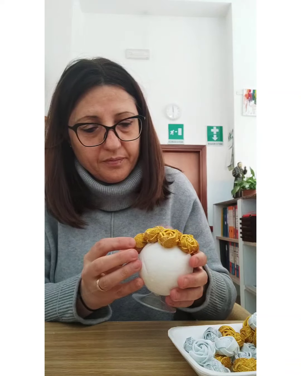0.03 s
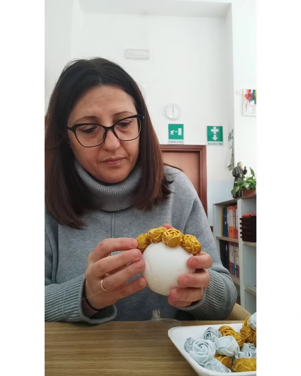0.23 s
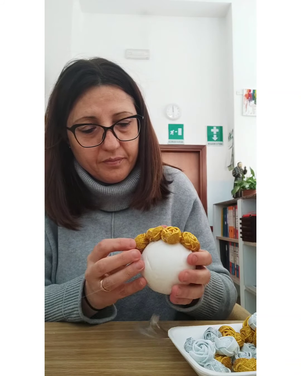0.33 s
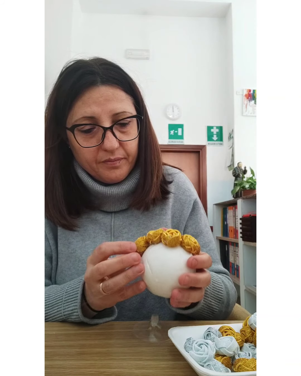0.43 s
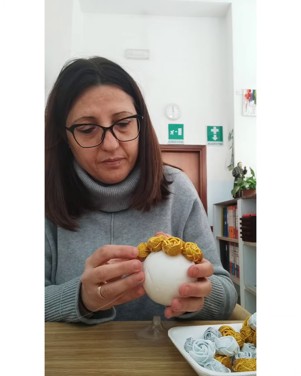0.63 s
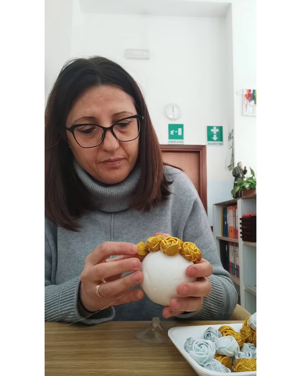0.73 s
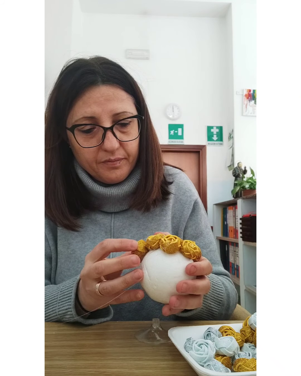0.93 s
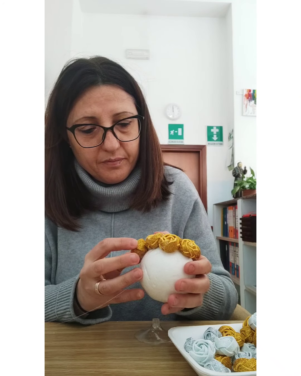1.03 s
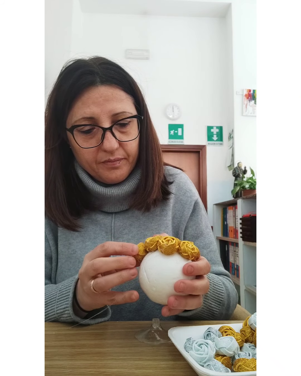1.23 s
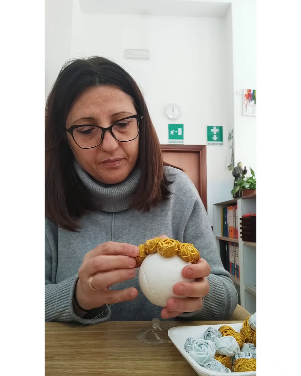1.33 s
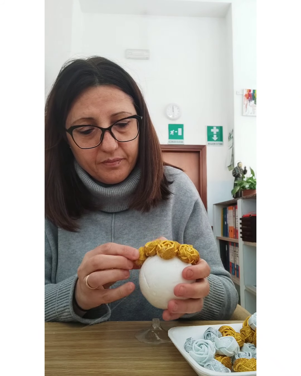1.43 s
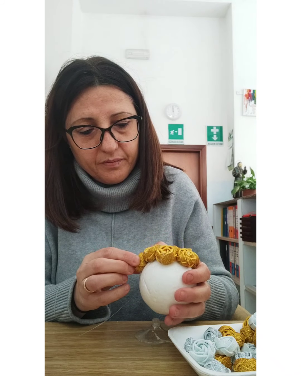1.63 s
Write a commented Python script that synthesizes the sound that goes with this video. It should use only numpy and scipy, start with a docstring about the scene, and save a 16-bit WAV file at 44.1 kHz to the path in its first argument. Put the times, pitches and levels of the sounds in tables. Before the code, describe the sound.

A small stand holding a foam ball lands on a wooden table with three quick knocks, then judders along in a squeaky, rattling scrape; soft hand brushes before and after, close stereo microphones, echoing room.

```python
"""Foam ball on a stand, pushed over a table

A foam ball on a clear stemmed stand is set down on a wooden table and pushed along it in a bare, echoing room.
The foot knocks three times (struck modes, crack, thud), then judders in tiny slips: noise bursts and chirps.
Fingers and sleeves brush the foam and its fabric flowers before and after, as swells of grainy noise.
Behind lies a faint room rumble of filtered noise. The stand is nearer the left of two microphones."""
import sys
import numpy as np
from scipy import signal
from scipy.fft import rfft, irfft
from scipy.io import wavfile
from scipy.ndimage import uniform_filter1d

SR = 44100
rng = np.random.default_rng(int(sys.argv[2]) if len(sys.argv) > 2 else 0)


def dump(signal):
    """Clip the signal to [-1, 1] and save it as 16-bit WAV at the path in sys.argv[1]."""
    limited = np.clip(np.atleast_2d(signal).T, -1, 1)
    pcm = np.round(limited * 32767).astype(np.int16)
    wavfile.write(sys.argv[1], SR, pcm)


N = 74970
TIME = np.arange(N) / SR

# modes of the stand: (frequency [Hz], relative level [dB], t60 [s])
STAND_MODES = [(2390, -7.5, 0.019), (2460, -15.5, 0.012), (2996, -8, 0.073), (3320, -3.5, 0.02),
               (3832, -14, 0.09), (6325, 3, 0.029), (6700, -12, 0.066), (7640, -3.5, 0.011),
               (7990, -9.5, .04), (9280, -27.5, 0.024), (10700, -25, 0.036), (11390, -25.5, 0.035),
               (11800, -35, .03), (13700, -14.5, 0.009), (16100, -19, .014)]
# modes of the table top: (frequency [Hz], relative level [dB], t60 [s])
TABLE_MODES = [(188, -12.5, 0.056), (230.5, -10, 0.044), (465, -8, .025), (872, -10.5, 0.05)]

SCRAPE_LIKENESS = 0.53   # how alike the two microphones hear scrape and crack, 1 = the same
SLIP_SPREAD_DB = 4   # spread of strength from slip to slip


def from_db(db):
    """Decibels to gain."""
    return 10 ** (np.asarray(db) / 20)


def rms_one(x):
    """Scale to rms 1."""
    return x / np.sqrt(np.mean(x ** 2) + 1e-20)


def at_hz(points, hz):
    """Read a table on a log-frequency axis."""
    f, value = np.transpose(points)
    return np.interp(np.log(np.maximum(hz, 1)), np.log(f), value)


def level_curve(rows):
    """Gain that follows (time [s], level [dB]) rows and is silent outside them."""
    return from_db(np.interp(TIME, *np.transpose(rows), left=-np.inf, right=-np.inf))


def fade(start, length):
    """Sudden onset and exponential decay, to 1/e after the length in seconds."""
    return (TIME >= start) * np.exp(-np.maximum(TIME - start, 0) / length)


def swell(centre, half_length):
    """A smooth bell-shaped rise and fall."""
    return np.exp(-.5 * ((TIME - centre) / half_length) ** 2)


def noise(likeness):
    """Stereo white noise whose channels are partly alike."""
    mid, side = rng.standard_normal((2, N))
    c = np.clip(likeness, -1, 1)
    opposite = side * np.array([[1], [-1]])
    return (np.sqrt(1 + c) * mid + np.sqrt(1 - c) * opposite) / np.sqrt(2)


def colour(x, spectrum, share=1, keep_power=True):
    """Causal (minimum-phase) filter that follows a share of a dB spectrum."""
    gain = from_db(share * at_hz(spectrum, np.fft.rfftfreq(2 * N, 1 / SR)))
    cepstrum = irfft(np.log(rms_one(gain) if keep_power else gain))
    # folding the cepstrum onto positive time makes the phase minimal
    cepstrum[1:N] *= 2
    cepstrum[N + 1:] = 0
    return irfft(rfft(x, 2 * N) * np.exp(rfft(cepstrum)))[..., :N]


def ring(x, hz, t60):
    """A two-pole resonance: a unit click sets a decaying sine of height about 1 ringing."""
    r = np.exp(-np.log(1000) / (t60 * SR))
    w = 2 * np.pi * hz / SR
    return signal.lfilter([.5, 0, -.5], [1, -2 * r * np.cos(w), r * r], x + 1e-18)


def resonate(drive, modes):
    """A drive rings each mode, scaled so that white noise of rms 1 gives the mode its listed level."""
    out = 0
    for hz, db, t60 in modes:
        noise_rms = np.sqrt(t60 * SR / (4 * np.log(1000)))
        out = out + from_db(db) * ring(drive, hz, t60) / noise_rms
    return out


def slide():
    """Stick and slip of the foot squeaks, scrapes and drives stand and table, and ends in a duller rasp."""
    # strength of the sliding friction: (time [s], level [dB])
    push_rows = [(0.26, -33), (0.285, -39), (0.358, -39.5), (0.379, -18), (0.40, -29), (0.462, -44.5),
                 (0.483, -24), (0.545, -35.5), (0.59, -24), (0.605, -29.5), (0.74, -25.5), (0.815, -29),
                 (0.90, -27), (0.953, -28), (0.965, -31), (1.01, -35.5), (1.035, -59), (1.07, -59)]
    # the foot snags and jerks free: (time [s], level [dB], tilt [dB per octave])
    snag_rows = [(0.3613, -27.5, 14), (0.3756, -13.5, -10), (0.3823, -16, 9), (0.3928, -27, 17.5),
                 (0.6891, -24, 16.5), (0.7276, -17.5, -16), (0.7339, -25, 2), (0.7641, -36, -14),
                 (0.7953, -27, 21), (0.8509, -18.5, 7.5), (0.8861, -20, -9.5), (0.8976, -24, 11),
                 (0.9098, -31, 21), (0.9166, -20, -5), (0.9346, -20, -1), (0.9526, -20.5, 6)]
    # the sliding stand sounds weakly between its groups of modes: (frequency [Hz], gain [dB])
    radiation = [(1200, -4), (2300, 2), (3200, -4), (3650, -14), (4200, -17.5), (5700, -14.5), (6250, -4),
                 (8100, 4), (8500, -25.5), (9200, 9.5), (12000, -5), (15500, -4)]
    # dry scrape of foot on wood: (frequency [Hz], relative density [dB per Hz])
    grit_spectrum = [(90, -26.5), (200, 2), (500, 3), (900, -2.5), (1200, -1), (2000, 4), (3100, 8),
                     (3700, -38), (4300, -2), (5200, 1.5), (7800, 4.5), (8500, -13.5), (10500, -16),
                     (16000, -21.5)]
    # how hard the foot drives the table top: (time [s], level [dB])
    drive_rows = [(0.28, -47.5), (0.38, -43), (0.45, -45.5), (0.64, -50.5), (0.675, -39), (0.77, -47.5),
                  (0.84, -35.5), (0.89, -45.5), (0.945, -37), (1.03, -51.5)]
    ring_db, squeak_db, grit_db = 1, -4.5, -5
    # a duller rasp as the foot slows
    stop_s, stop_width_s, stop_hz, stop_t60_s, stop_db = 0.94, 0.022, 1640, 0.0031, -35

    at = slip_times()
    push = level_curve(push_rows)

    noise_power = sum(from_db(2 * db) * t60 * SR / (4 * np.log(1000)) for _, db, t60 in STAND_MODES)
    rings = sum(from_db(db) * ring(push * friction(at), hz, t60) for hz, db, t60 in STAND_MODES)
    stand = from_db(ring_db) * rings / np.sqrt(noise_power) + strike(snag_rows)
    stand = stand + from_db(squeak_db) * push * squeaks(at)

    # the dry scrape judders less than the ring
    scrape = from_db(grit_db) * colour(push * friction(at, steady=1), grit_spectrum)
    wood = scrape + resonate(level_curve(drive_rows) * friction(at), TABLE_MODES)

    rasp = ring(ring(friction(at), stop_hz, stop_t60_s), stop_hz, stop_t60_s / 2)
    rasp = from_db(stop_db) * rms_one(rasp) * swell(stop_s, stop_width_s)
    return colour(stand, radiation, keep_power=False) + wood + rasp


def slip_times(count=400):
    """Sample positions of the slips, which follow each other at uneven gaps."""
    median_gap_s, jitter = 1 / 160, .4
    gaps = np.exp(jitter * rng.standard_normal(count)) * median_gap_s
    at = (np.cumsum(gaps) * SR).astype(int)
    return at[at < N]


def friction(at, steady=.3):
    """Each slip is a burst of grit of its own strength, over steady rubbing; rms 1."""
    slip_s = .0014   # decay to 1/e
    kicks = np.zeros(N)
    kicks[at] = from_db(SLIP_SPREAD_DB * np.clip(rng.standard_normal(len(at)), -2, 1.5))
    bursts = signal.lfilter([1], [1, -np.exp(-1 / (slip_s * SR))], kicks) + steady
    return rms_one(bursts * noise(SCRAPE_LIKENESS))


def squeaks(at, size=600):
    """Every slip starts a short chirp that rises as the foot grips again; rms 1."""
    # pitch around which the squeaks start, lowest as the foot slows: (time [s], frequency [Hz])
    pitch_rows = [(0.38, 2330), (0.47, 2280), (0.51, 2120), (0.59, 2336), (0.75, 2308), (0.91, 2116),
                  (0.96, 1680), (1.01, 1160)]
    rise_hz_per_s, peak_s, spread_hz = 54700, 0.002, 47
    out = np.zeros(N + size)
    t = np.arange(size) / SR
    draws = np.clip(rng.standard_normal((len(at), 2)), -2, 1.5)
    for start, (strength, detune) in zip(at, draws):
        hz = np.interp(start / SR, *np.transpose(pitch_rows)) + spread_hz * detune
        turns = hz * t + rise_hz_per_s * t ** 2 / 2
        envelope = from_db(SLIP_SPREAD_DB * strength) * t * np.exp(-t / peak_s)
        out[start:start + size] += envelope * np.sin(2 * np.pi * turns)
    return rms_one(out[:N])


def strike(rows):
    """Blows of (time [s], level [dB], tilt [dB per octave]) ring the stand; tilt favours upper or lower modes."""
    build_up_t60_s = .003
    s, db, tilt = np.transpose(rows)
    middle_hz = np.sqrt(STAND_MODES[0][0] * STAND_MODES[8][0])
    out = np.zeros((2, N))
    for hz, mode_db, t60 in STAND_MODES:
        octaves = np.clip(np.log2(hz / middle_hz), -1, .5)
        scatter_db = rng.normal(0, 1.5, (len(s), 2))   # each blow differs a little at each microphone
        clicks = np.zeros((2, N))
        clicks[:, (s * SR).astype(int)] = from_db(db + mode_db + tilt * octaves + scatter_db.T)
        # taking away a brief ring softens the onset
        out += ring(clicks, hz, t60) - ring(clicks, hz, build_up_t60_s)
    return out


def knocks():
    """The foot lands: a crack, the ring of the stand and a thud that rings the table top."""
    # landings: (time [s], ring [dB], ring tilt [dB per octave], crack [dB],
    #            table thud [dB], thud tilt [dB per octave])
    landings = [(0.2343, -29, -1, -11.5, -36.5, -1), (0.2598, -15, 11, -8.5, -31.5, 2),
                (0.2877, -22.5, 10, -29, -41.5, 4)]
    # crack of a knock: (frequency [Hz], relative density [dB per Hz])
    crack_spectrum = [(300, -24.5), (2000, 10), (3200, -5.5), (4200, -5.5), (6000, 1.5), (8100, 6.5),
                      (9000, 3), (12000, -53), (16000, -39.5)]
    # thud of the table top: (frequency [Hz], relative density [dB per Hz])
    thud_spectrum = [(70, -25.5), (200, 7), (450, 3), (1000, 1.5), (1600, -1.5), (3000, -5), (6000, -41.5),
                     (16000, -85.5)]
    crack_s, table_knock_db = 0.00067, 1.5

    crack, thuds = 0, 0
    for s, _, _, crack_db, thud_db, thud_tilt in landings:
        crack = crack + from_db(crack_db) * (fade(s, crack_s) - fade(s, crack_s / 10))
        thuds = thuds + thud(s, thud_db, thud_tilt)
    crack = colour(crack * noise(SCRAPE_LIKENESS), crack_spectrum)
    wood = colour(thuds, thud_spectrum) + from_db(table_knock_db) * resonate(thuds, TABLE_MODES)
    return strike([row[:3] for row in landings]) + crack + wood


def thud(start, db, tilt):
    """A bending wave sweeps down in pitch, since its low end travels slower, and leaves a scattered rumble."""
    delay_s, ref_hz = .0042, 1000   # the delay at the reference frequency
    return_s, return_db, scatter_db, decay_s = .003, -4.5, 1.5, 0.0087
    hz = np.fft.rfftfreq(N, 1 / SR)
    sweep = np.exp(-2j * np.pi * (hz * start + 2 * delay_s * np.sqrt(ref_hz * hz)))
    second_arrival = from_db(return_db) * np.exp(-2j * np.pi * hz * return_s)
    wave = irfft(sweep * (1 + second_arrival), N) * np.sqrt(decay_s * SR)
    wave = wave + from_db(scatter_db) * fade(start, decay_s) * noise(likeness=0.45)
    slope = [(ref_hz * 2 ** octave, db + tilt * octave) for octave in (-2, 2)]
    return colour(wave, slope, keep_power=False)


def brushes():
    """Soft, grainy hiss of skin and wool on the foam."""
    # strokes of fingers and sleeves: (time [s], half length [s], level [dB])
    strokes = [(0.0, 0.017, -50.5), (0.08, .03, -50.5), (0.172, .027, -46), (1.181, 0.034, -53.5),
               (1.287, 0.048, -61), (1.419, 0.046, -68), (1.518, 0.048, -63.5)]
    # hiss: (frequency [Hz], relative density [dB per Hz])
    hiss_spectrum = [(200, -1), (1200, -7.5), (2200, -15.5), (5000, -9), (8000, 1.5), (9500, -14),
                     (12000, -17.5), (16000, -19)]
    grain_db = 3.5
    level = sum(from_db(db) * swell(s, half) for s, half, db in strokes)
    roughness = rms_one(uniform_filter1d(rng.standard_normal(N), size=90))   # averaged over about 2 ms
    grain = rms_one(from_db(grain_db * roughness))
    return colour(level * grain * noise(likeness=0.17), hiss_spectrum)


def room(x):
    """Diffuse echo of bare walls: noise dying band by band."""
    # decay time: (frequency [Hz], t60 [s])
    decay_times = [(150, 0.27), (600, 0.89), (2400, 1.47), (6300, 0.65), (9000, 0.34), (15000, 0.25)]
    # strength of the echo: (frequency [Hz], level [dB])
    echo_levels = [(150, -25), (600, -6), (2400, -10), (6300, -11), (9000, -7), (15000, -12)]
    delay_s = 0.0027
    hz = np.fft.rfftfreq(N, 1 / SR)
    edges = np.geomspace(100, 18000, 16)
    white, tail = rfft(noise(likeness=0.3)), 0
    for low, high in zip(edges, edges[1:]):
        centre = np.sqrt(low * high)
        band = irfft(white * ((hz >= low) & (hz < high)), N)
        decay = fade(delay_s, at_hz(decay_times, centre) / np.log(1000))
        tail = tail + band * from_db(at_hz(echo_levels, centre)) * decay / np.linalg.norm(decay)
    return signal.fftconvolve(x, tail, axes=1)[:, :N]


def rumble():
    """Steady faint room rumble: coloured noise, much alike at both microphones."""
    # rumble: (frequency [Hz], relative density [dB per Hz])
    rumble_spectrum = [(20, -2.5), (30, -11), (41, 10.5), (52, -4), (100, -9.5), (200, -8), (450, -17),
                       (1000, -22), (2500, -28.5), (4500, -50.5), (8000, -42.5), (16000, -68.5)]
    return from_db(-51) * colour(noise(likeness=0.85), rumble_spectrum)


def lag_right(x):
    """The stand's sound reaches the right microphone later."""
    lag_s = 0.00015
    late = np.exp(-2j * np.pi * np.fft.rfftfreq(N, 1 / SR) * lag_s)
    return np.array([x[0], irfft(rfft(x[1]) * late, N)])


def to_left(x, share):
    """Place a sound to the left by a share of the full level difference, split between the channels."""
    # the stand is nearer the left microphone: (frequency [Hz], left minus right [dB])
    left_lead = [(200, 5.5), (700, 11), (1500, 5.5), (2500, 12.5), (3200, 11.5), (5000, 1), (6500, 5),
                 (7500, 10.5), (8100, 3), (10500, 5), (12000, 10.5), (15500, 11)]
    left = colour(x[0], left_lead, share / 2, keep_power=False)
    right = colour(x[1], left_lead, -share / 2, keep_power=False)
    return np.array([left, right])


def scene():
    """Stand, hands, room echo and rumble, each placed between the microphones."""
    stand = slide() + knocks()
    hands = brushes()
    direct = to_left(lag_right(stand), share=0.95)
    echo = to_left(room(stand + hands), share=0.36)
    return direct + echo + to_left(hands + rumble(), share=0.86)


def record(dry):
    """The top is cut steeply above 16 kHz."""
    low_pass = signal.ellip(10, .1, 80, 16000, fs=SR, output="sos")
    return signal.sosfilt(low_pass, dry)


dry = scene()
out = record(dry)
dump(out)
```